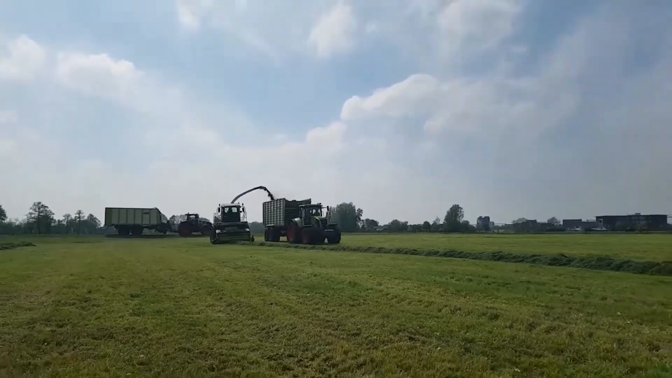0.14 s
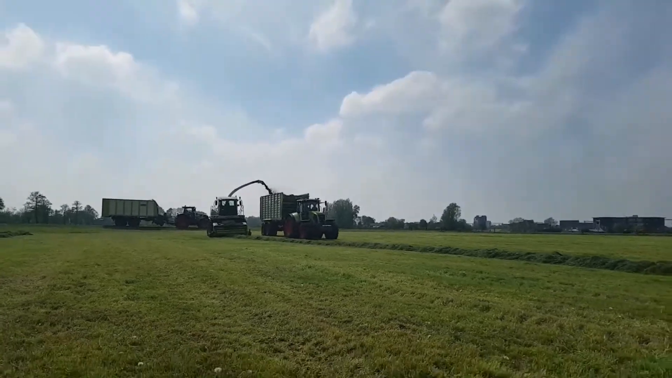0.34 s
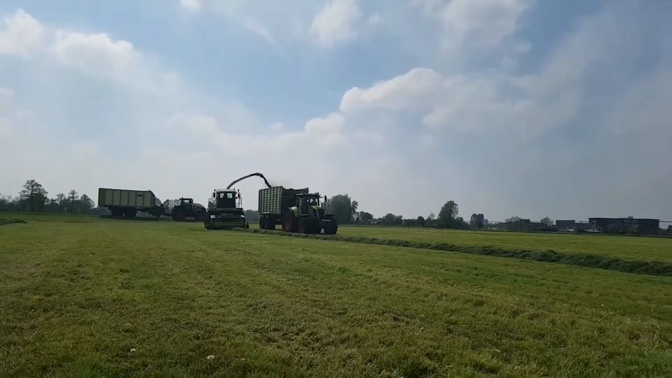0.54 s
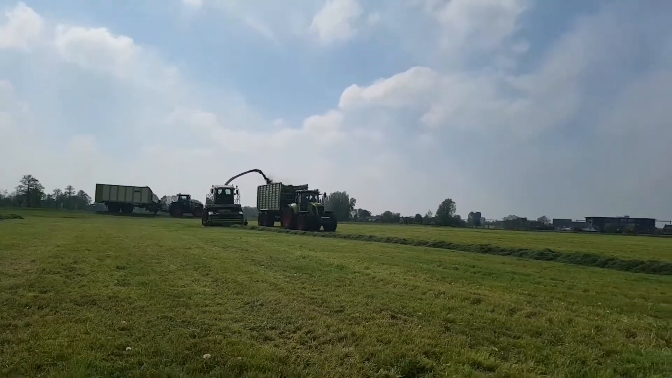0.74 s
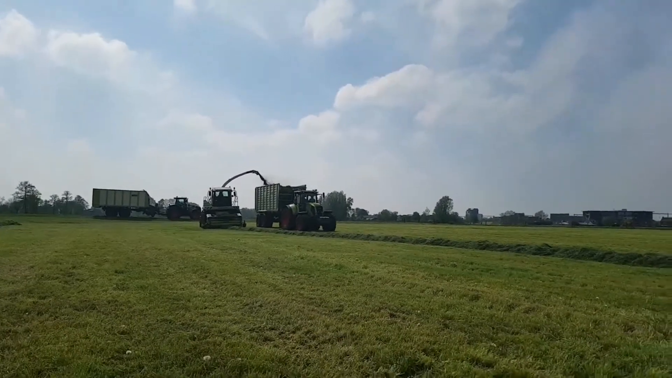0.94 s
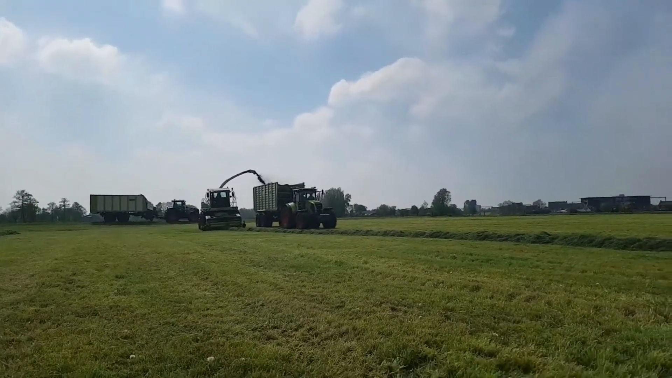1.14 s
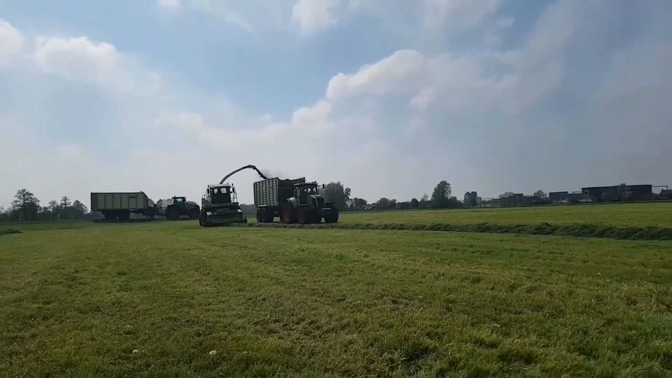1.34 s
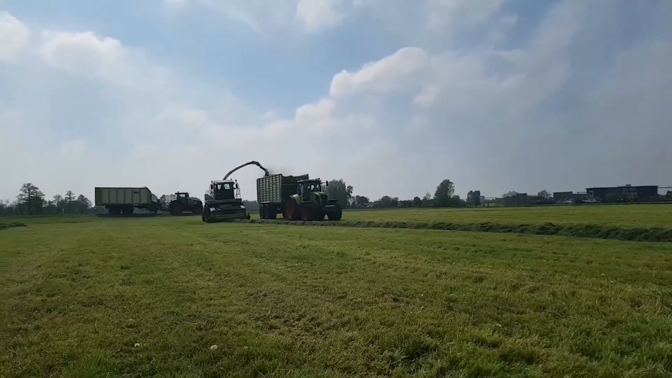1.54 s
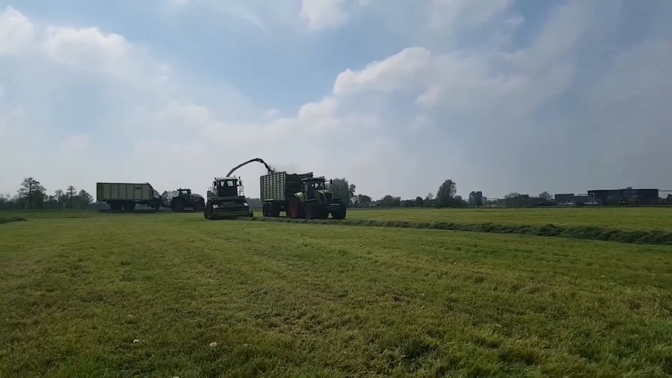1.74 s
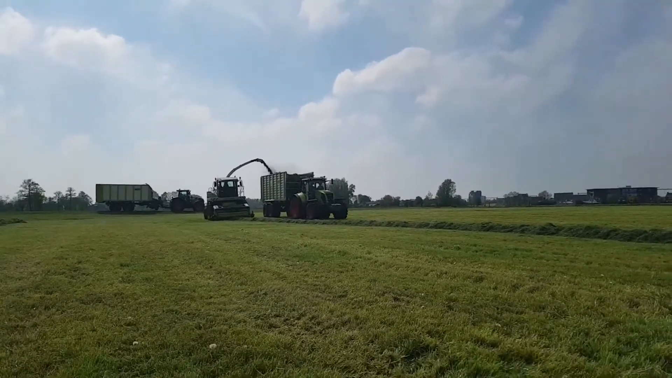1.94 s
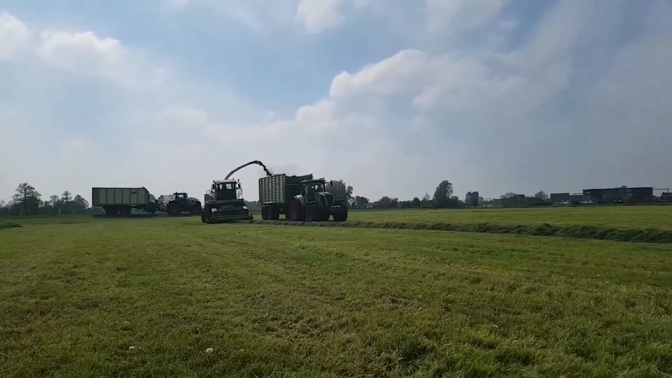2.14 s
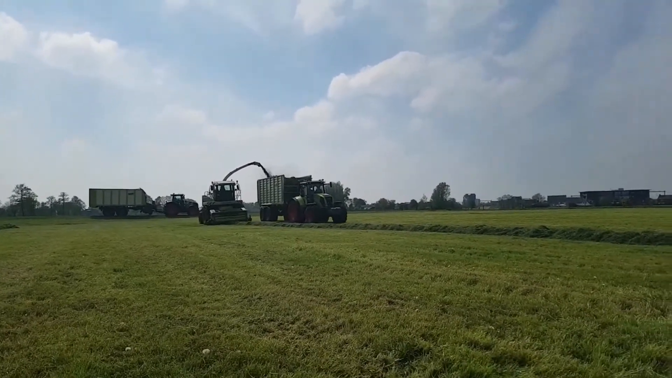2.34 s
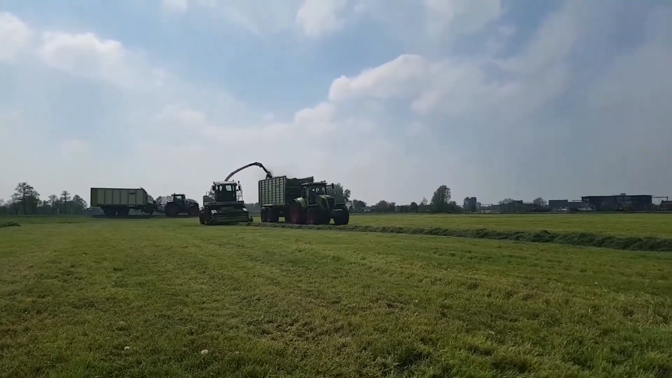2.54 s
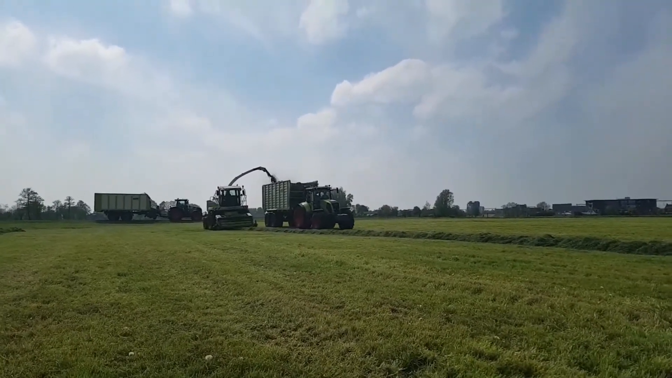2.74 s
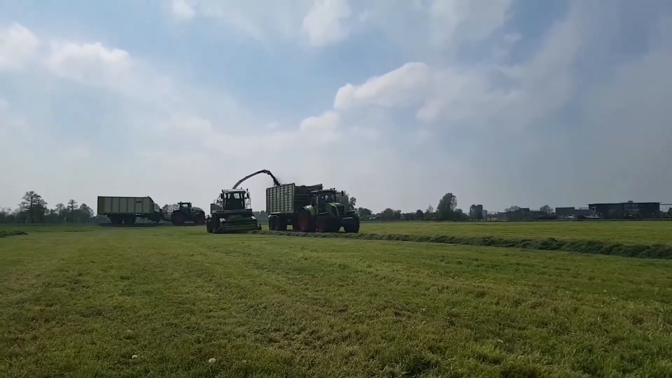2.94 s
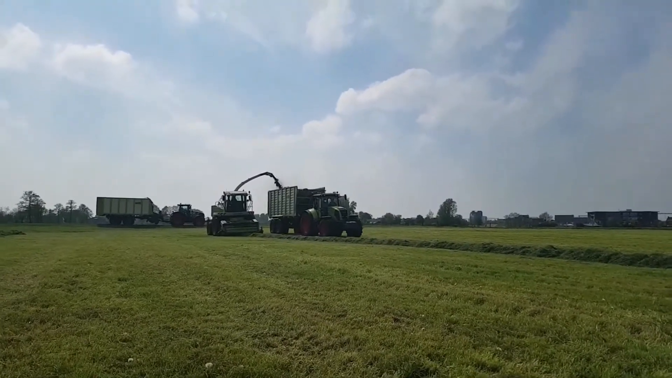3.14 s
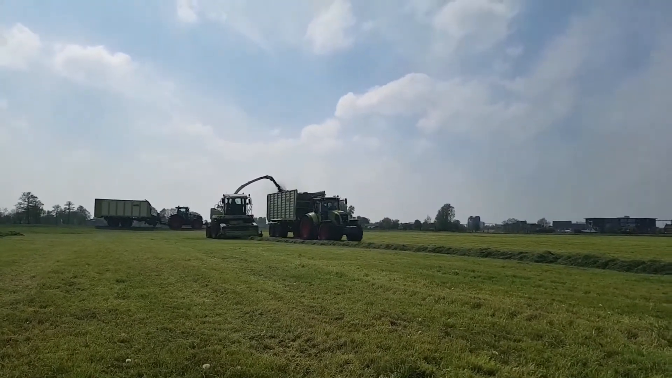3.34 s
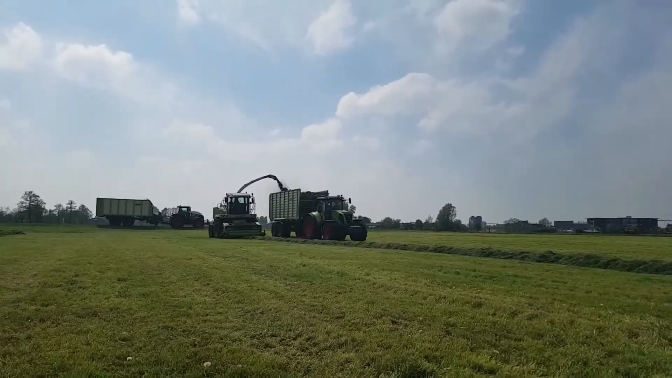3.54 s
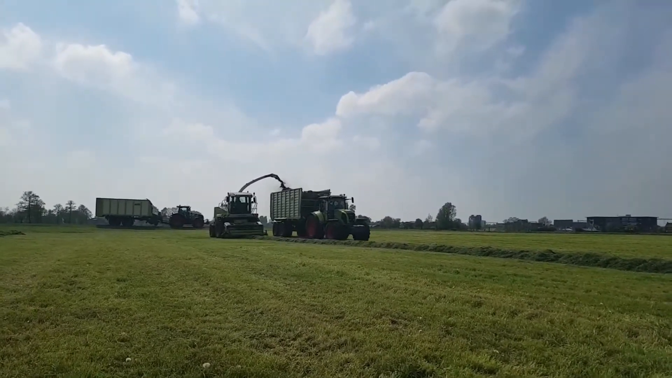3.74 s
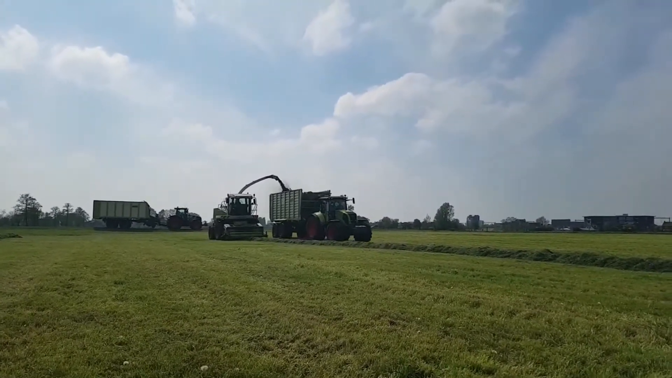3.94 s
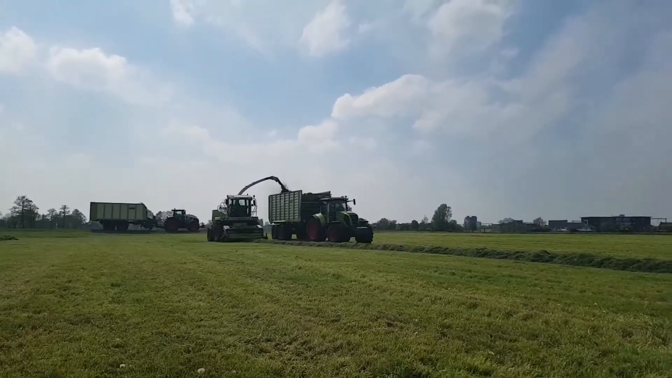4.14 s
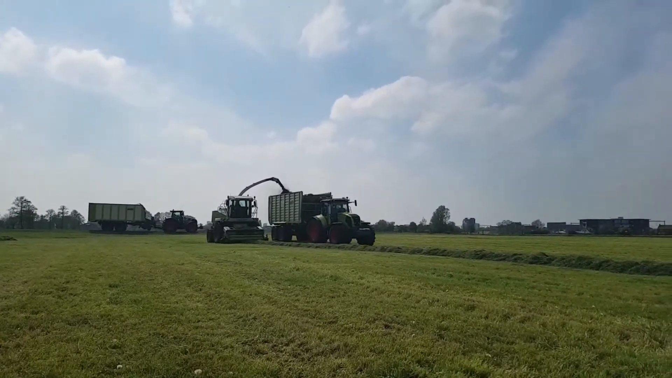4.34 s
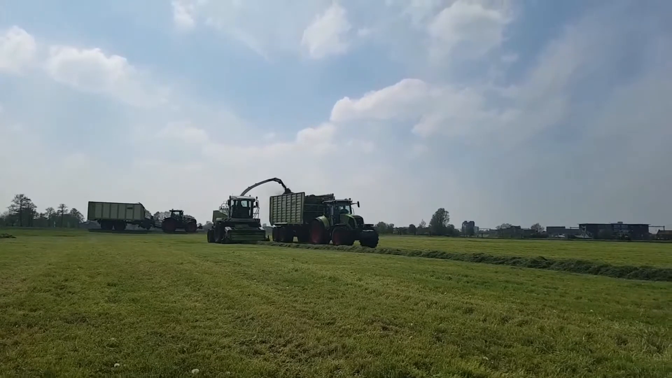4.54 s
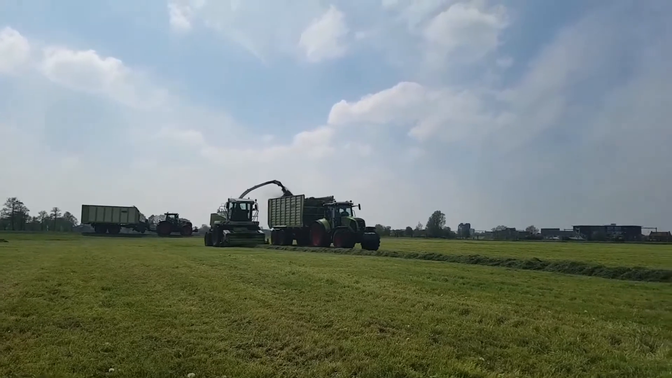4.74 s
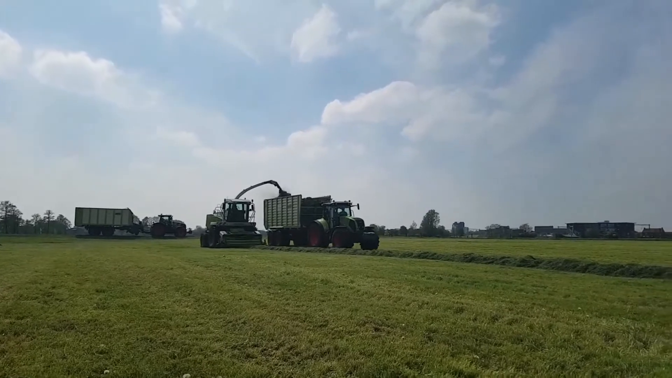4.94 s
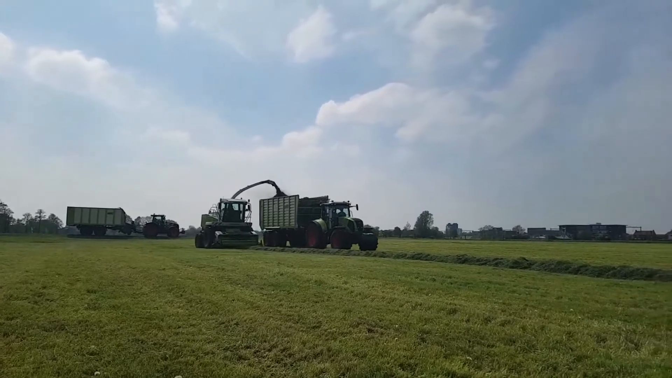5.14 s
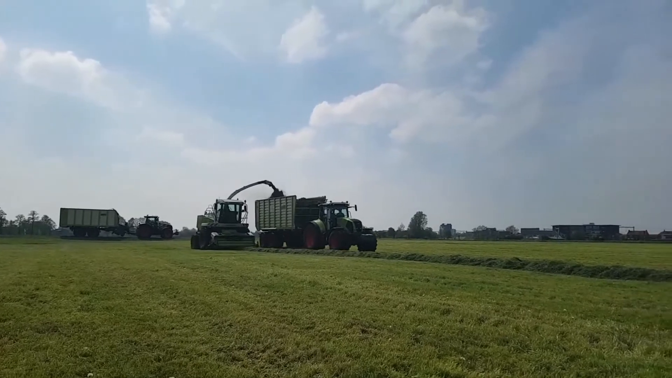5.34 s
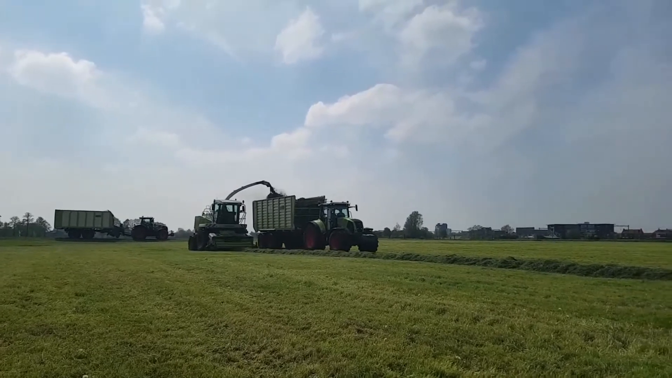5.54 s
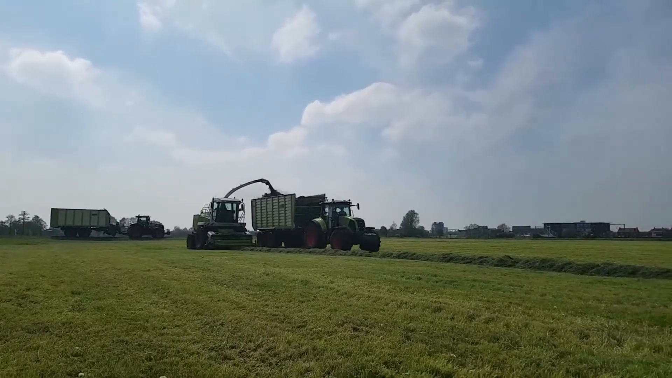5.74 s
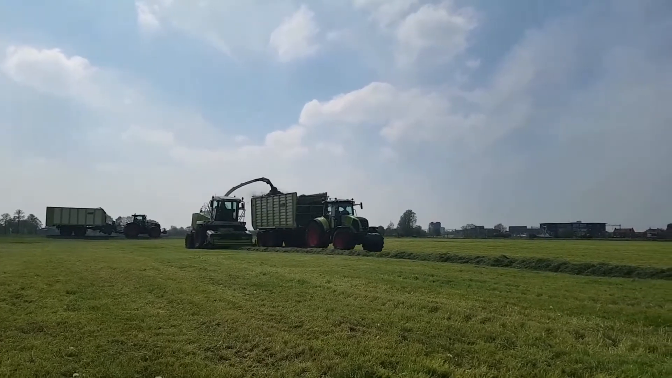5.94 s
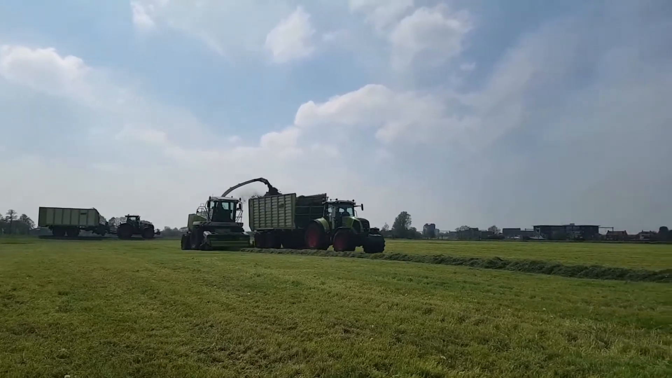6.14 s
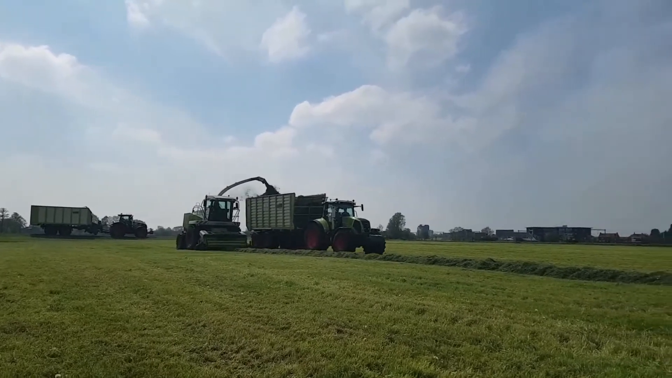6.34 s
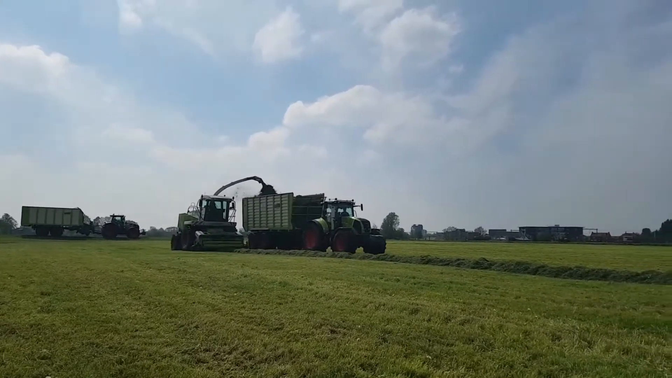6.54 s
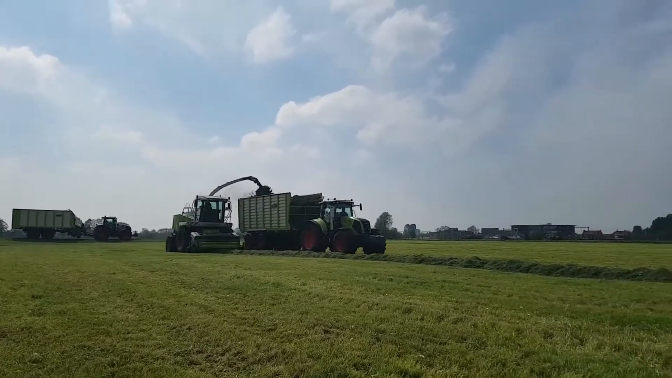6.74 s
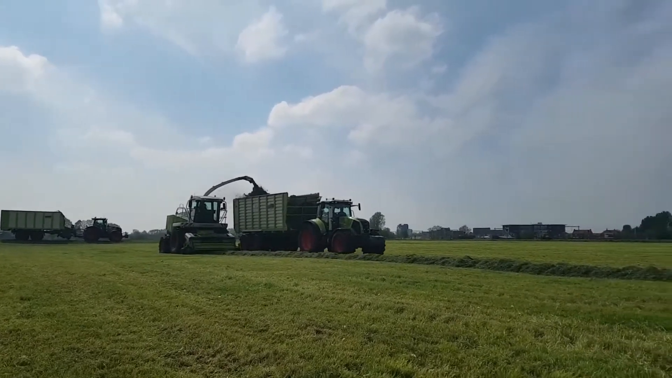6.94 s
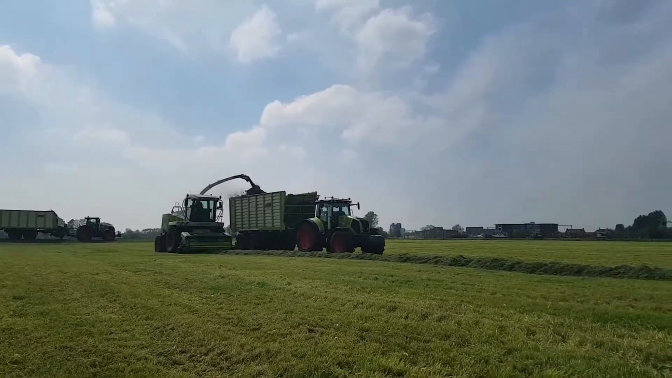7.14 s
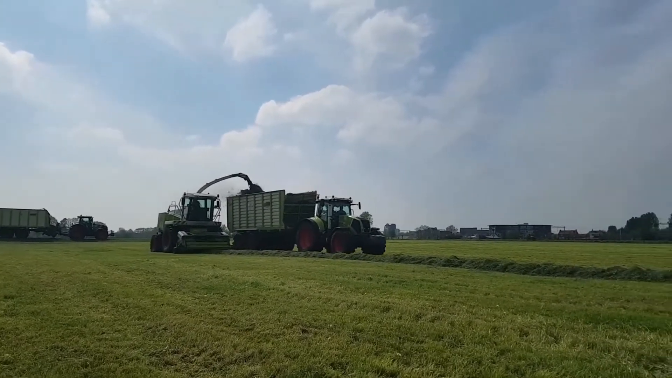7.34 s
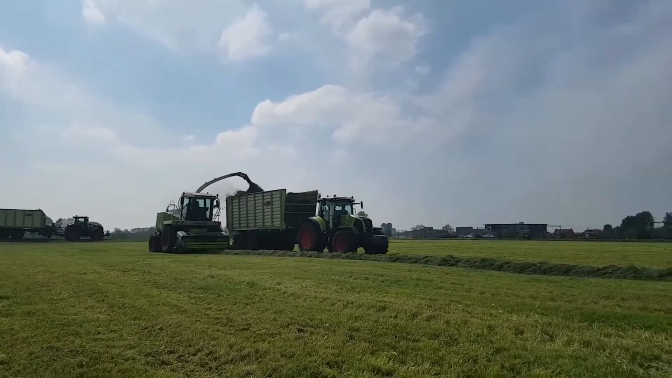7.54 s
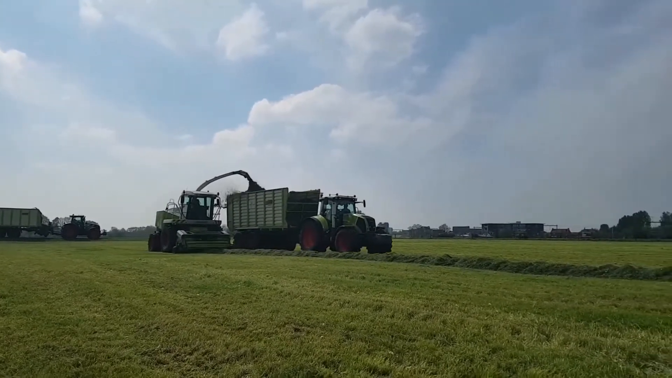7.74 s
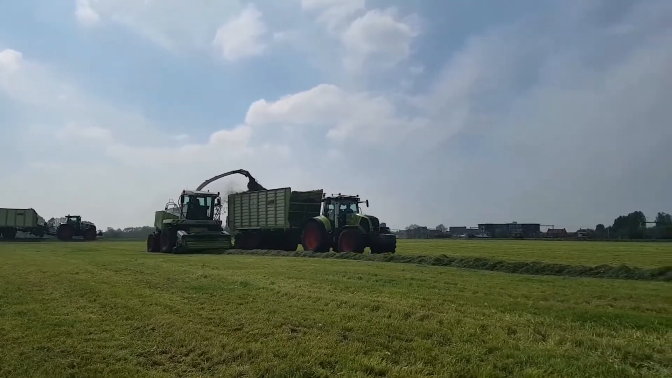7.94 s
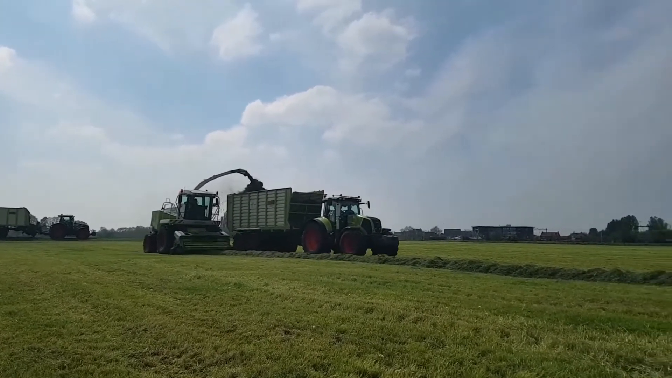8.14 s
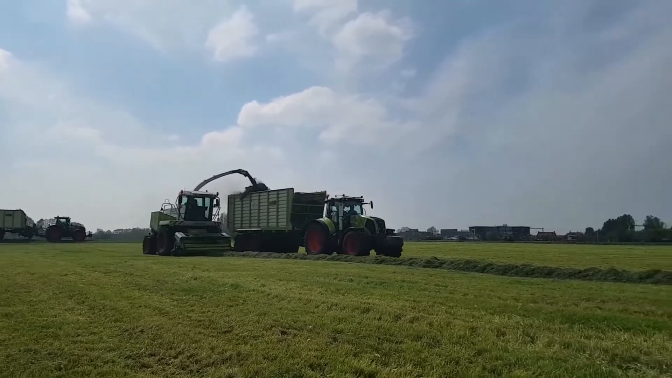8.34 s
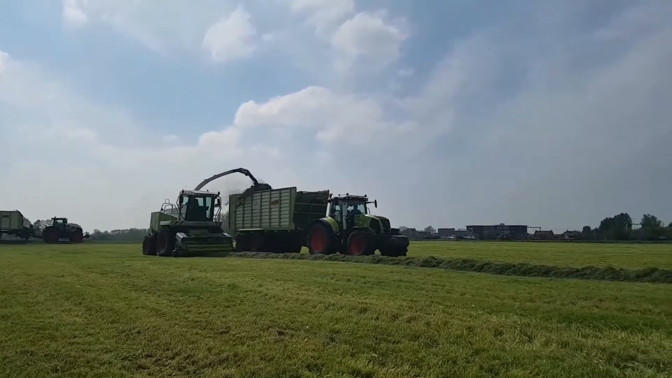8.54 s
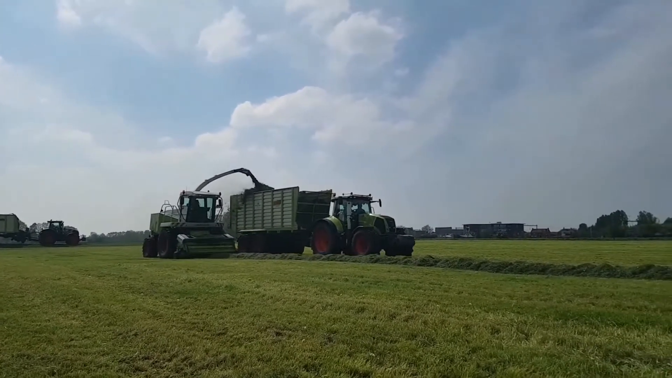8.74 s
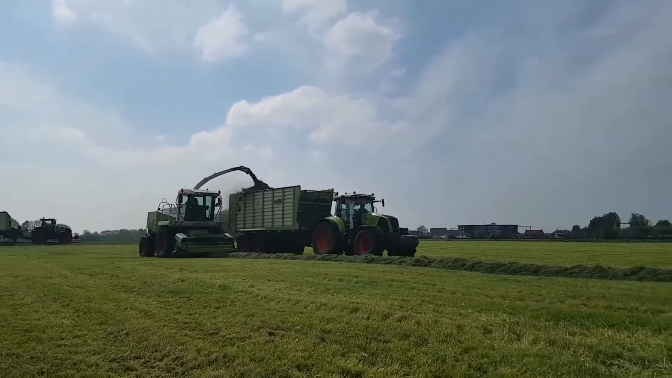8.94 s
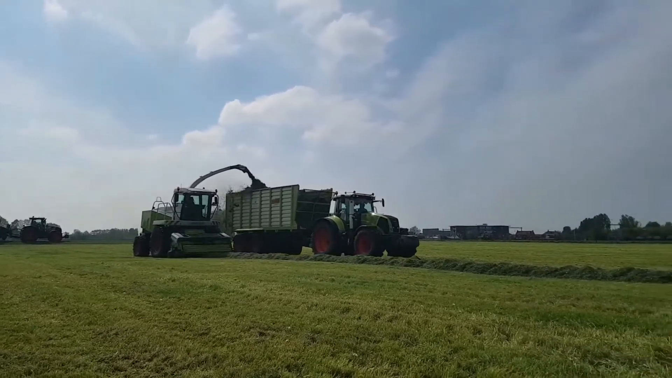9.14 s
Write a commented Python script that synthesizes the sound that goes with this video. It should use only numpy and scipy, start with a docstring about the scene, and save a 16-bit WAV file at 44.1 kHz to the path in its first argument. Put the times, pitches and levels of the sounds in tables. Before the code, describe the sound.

Deep humming drone of a grass chopper with tractor and wagon approaching, broadband roar and faint whine swelling, wind buffeting the microphone at first.

```python
"""Open field: a forage harvester and a tractor with wagon draw nearer, heard by a phone with two ports.
The chopping drum drones at six beats a turn, as wavering sine harmonics with weaker shaft orders.
A pump whines, and the tractor engine and turbos drift in pitch; all are sine partials.
Crop stream and fans roar as banded noise; wind buffets each port alone as filtered noise and short pops."""
import sys
import numpy as np
from scipy import signal
from scipy.fft import rfft, irfft, next_fast_len
from scipy.io import wavfile
from scipy.ndimage import uniform_filter1d

SR = 44100
rng = np.random.default_rng(int(sys.argv[2]) if len(sys.argv) > 2 else 0)


def persist_wave(psi):
    """Save psi, clipped to +-1, as 16-bit WAV."""
    counts = np.round(np.clip(psi, -1, 1) * 32767).astype(np.int16)
    wavfile.write(sys.argv[1], SR, np.atleast_2d(counts).T)


N = 409688

# drum speed under the changing crop load: (t/s, beat rate f/Hz)
DRUM_SPEED = [(0, 123.1), (1.45, 122.8), (2.0, 121.9), (2.6, 122.4), (4.15, 121.8), (4.65, 123),
              (5.0, 121.6), (6.1, 121.2), (7.0, 122.1), (7.8, 121.4), (8.3, 122.4), (9.29, 121.7)]
# the drone fades deeply while far away and steadies as it nears: (t/s, level/dB)
DRONE_LEVEL = [(0.0, -22), (0.13, -14), (0.36, -16.5), (0.44, -23.5), (0.82, -13.5), (0.96, -27),
               (1.01, -17), (1.09, -24.5), (1.81, -15), (2.3, -18.5), (2.74, -12), (3.18, -15.5),
               (3.7, -12), (3.83, -16.5), (4.04, -10), (4.32, -16.5), (4.47, -14), (4.58, -18),
               (4.73, -11.5), (5.98, -9.5), (9.21, -11.5), (9.29, -10)]
# even harmonics of the beat: (t/s, second level/dB, fourth level/dB)
EVEN_LEVEL = [(0.0, -22.5, -43), (0.13, -46, -43), (0.36, -29, -36), (0.8, -40, -34), (0.9, -28, -37),
              (1.09, -40, -31), (1.78, -37.5, -51), (1.99, -35, -36), (2.07, -30, -39.5),
              (2.48, -37.5, -39.5), (3.02, -33, -34.5), (4.14, -29.5, -37), (4.79, -39.5, -31.5),
              (6.42, -27, -34), (6.7, -26.5, -28.5), (8.38, -25, -32), (8.51, -26, -27.5),
              (9.16, -27, -35.5), (9.29, -32, -47)]
# the third harmonic swells and sinks on its own: (t/s, level/dB)
THIRD_LEVEL = [(0, -40), (.17, -26.5), (.55, -37), (.85, -26), (1.3, -38.5), (1.8, -29.5), (2.55, -36),
               (2.8, -26.5), (3.5, -38.5), (3.7, -30.5), (3.83, -30.5), (3.95, -18.5), (4.1, -30.5),
               (4.25, -26), (4.45, -40), (4.65, -27.5), (4.8, -37), (4.98, -23.5), (5.4, -27), (6.1, -20),
               (6.7, -23.5), (6.97, -28.5), (7.3, -21.5), (7.46, -25), (7.8, -16.5), (8.05, -26),
               (8.27, -19.5), (8.45, -34), (8.62, -23), (8.8, -30), (9.08, -16.5), (9.29, -24)]
# upper harmonics surge unevenly: (t/s, fifth level/dB, sixth level/dB, eighth level/dB)
UPPER_LEVEL = [(0.0, -56, -41, -44), (0.15, -42, -47, -66), (0.26, -42.5, -43, -55),
               (0.57, -45.5, -58, -56), (0.88, -43, -44, -48), (1.27, -48, -54.5, -55.5),
               (2.25, -51.5, -50, -44), (2.59, -47, -61, -52.5), (3.57, -48, -48.5, -52),
               (4.66, -48, -42.5, -43), (4.86, -46, -50, -53), (5.09, -48, -40, -47), (5.4, -49, -42, -51),
               (5.6, -47.5, -51, -48), (5.87, -47, -51, -46), (6.16, -41, -43.5, -49),
               (7.58, -47.5, -55, -47), (7.71, -40.5, -43, -49), (8.8, -39, -60, -42),
               (9.11, -35.5, -42, -50), (9.29, -37, -48, -44)]
# weaker orders of the drum shaft: (multiple of the turn rate, level at mean distance/dB)
SHAFT_ORDERS = [(5, -32), (8, -34.5), (10, -39), (16, -43), (42, -52), (54, -55), (60, -56)]
# pump harmonics and one whine just off the series: (multiple of the pump rate, level at mean distance/dB)
PUMP_HARMONICS = [(1, -49), (2, -56), (3, -57), (5.037, -64), (6, -56)]
# swells of the whine, added as power: (t/s, length/s, multiple of the pump rate, level/dB)
PUMP_SWELLS = [(3.6, .55, 6, -48), (4.7, .15, 6, -47), (5.37, .17, 5.037, -40), (5.56, .3, 5.037, -43),
               (5.0, .25, 6, -45), (5.5, .75, 6, -43), (6.3, .42, 6, -43), (6.95, .5, 6, -45),
               (7.45, .45, 6, -42), (8.3, .3, 6, -42), (8.8, .5, 3, -47), (7.0, .4, 2, -48),
               (8.3, .9, 2, -48)]
# tractor firing note: (t/s, f/Hz, level/dB)
TRACTOR_FIRING = [(0, 55.2, -28.5), (1.65, 57.5, -38), (2.6, 60, -35.5), (3.7, 63, -35.5),
                  (4.3, 70.85, -29), (6.1, 71.8, -33.5), (7.3, 63.3, -42.5), (9.29, 62.3, -43)]
# turbo whistles, upper and lower: (t/s, f/Hz, level/dB)
TURBO_HIGH = [(0, 9240, -82), (.5, 8640, -79), (1.1, 7800, -84.5), (1.8, 7850, -74), (3, 7983, -70.5),
              (4.4, 8362, -65.5), (5, 8510, -74), (5.6, 8800, -74), (6, 9040, -95)]
TURBO_LOW = [(1.1, 4900, -90), (1.42, 5220, -67), (1.57, 5380, -52), (1.72, 5500, -65), (1.93, 5700, -76),
             (2.02, 5770, -62), (2.3, 5970, -65), (2.5, 6080, -70), (2.8, 6190, -72), (2.95, 6250, -63),
             (3.15, 6350, -63), (3.7, 6500, -80), (3.9, 6550, -95)]
# approach of the machines, used relative to its mean: (t/s, nearness level/dB, extra treble level/dB)
APPROACH = [(0.0, -43, -7), (1.03, -48.5, -7.5), (1.47, -44.5, -6.5), (2.53, -43.5, -8), (2.77, -42, -9),
            (3.4, -41.5, -5.5), (4.99, -38, -4), (5.3, -37.5, -4.5), (6.54, -36.5, -8.5), (6.91, -35, -3.5),
            (7.14, -36.5, -1.5), (7.45, -35.5, -4.5), (7.7, -36.5, -2), (8.23, -34.5, -5.5),
            (9.29, -36, -2)]
# relative spectrum of the roar: (f/Hz, level per Hz/dB)
ROAR_COLOUR = [(25, -21), (50, -12.5), (90, -4), (150, -0.5), (300, -11.5), (450, -11.5), (600, -19.5),
               (1100, -23), (1750, -20), (2600, -23.5), (4000, -29), (4900, -32), (5600, -37),
               (7600, -36.5), (8300, -46), (8700, -60), (12500, -64.5), (14000, -75)]
# ducts that colour the roar: (f/Hz, width/Hz, gain/dB)
DUCTS = [(795, 80, -3), (920, 60, -2), (1270, 90, -2), (1580, 260, -2), (1750, 110, -4), (1920, 160, 1.5),
         (2060, 170, -4.5), (2380, 250, -1), (2800, 200, 1.5)]
# likeness of the roar at the two ports: (f/Hz, shared part of the power 0-1)
SHARED = [(60, .99), (250, .98), (1000, .92), (1600, .8), (1950, .4), (2300, .85), (3000, .58), (4500, .38),
          (8000, .28)]
# light air between gusts, before the eddy bands: (t/s, level/dB)
BREEZE = [(0, -31.5), (2.6, -34), (2.9, -54), (3.6, -49.5), (4.2, -37), (7.0, -36.5), (9.29, -28)]
# strongest gusts, before the eddy bands: (t/s, length/s, level/dB, port: minus left, plus right)
GUSTS = [(0.027, 0.075, -15.5, -1.0), (0.41, 0.15, -17, -1.0), (0.44, 0.065, -17.5, 1.0),
         (0.626, 0.085, -20.5, -1.0), (0.719, 0.051, -16, 1.0), (0.855, 0.04, -15, 1.0),
         (0.892, 0.036, -20, -1.0), (0.94, 0.24, -16.5, 1.0), (1.08, 0.11, -17, -1.0),
         (1.195, 0.11, -18.5, 1.0), (2.329, 0.036, -18.5, -1.0), (4.315, 0.032, -18.5, 1.0),
         (5.729, 0.2, -20, 1.0), (6.968, 0.027, -14, 1.0), (8.069, 0.13, -20.5, -1.0),
         (8.772, 0.072, -20, -1.0)]
# sharp eddies, before filtering: (t/s, peak level/dB, rise/ms, port: minus left, plus right)
POPS = [(0.252, -9, .6, -1), (0.328, -10, 1.5, -1), (0.421, -6, .48, 1), (0.450, -8, .45, -1),
        (0.455, -5, .8, 1), (0.849, -8, .35, 1), (0.864, -2.5, .4, 1), (0.882, -6, .8, 1),
        (0.902, -7, .55, -1), (0.9105, -0.5, .45, 1), (0.935, -7, 1.3, 1), (0.953, -6, .4, 1),
        (0.965, -2, .36, 1), (0.980, -5.5, 1.1, 1), (0.9975, -5, .33, 1), (1.028, -7, 1.5, -1),
        (1.042, -8, .45, 1), (1.061, -6, .45, 1), (1.077, -5, 1.7, -1), (1.0955, -4, .33, -1),
        (1.100, -1.5, .36, -1), (1.127, -8, 1.5, -1), (1.211, -8, .55, 1)]
# level balance of the phone ports: (f/Hz, left minus right level/dB)
BALANCE_DB = [(60, 0), (120, -.3), (1200, -1), (1550, 1), (2300, -4.5), (3000, -7), (4000, -12),
              (5000, -9.5), (7000, -7), (8200, -8)]
# phase between the phone ports: (f/Hz, lead of the left/rad)
LEAD = [(0, 0), (120, .045), (240, .2), (860, .5), (1200, 1), (1500, .8), (1750, 1.8), (2100, -1.2),
        (2500, .5), (3200, .9), (4400, 3), (5500, 5.6), (6000, 6.4), (7200, 5.6), (8200, 6.9)]
# dip in the right port: (f/Hz, width/Hz, gain/dB)
RIGHT_NOTCH = (1940, 400, -7)

BEATS_PER_TURN, BEAT_WANDER_HZ = 6, 0.2974
PUMP_PER_BEAT = 3.642  # the pump is geared to the drum
ROAR_DB = -25.5  # RMS level ahead of the ports
RIPPLE_HZ, RIPPLE_DB = 60, 1.0
RASP_DB, RASP_RATE = .8, 45  # shared unevenness of the chopped stream in the treble; rate per second
CRACKLE_HZ, CRACKLE_DB, CRACKLE_MS = (450, 1100), -33, 7  # level for a 1 ms rise
POP_HZ = (75, 1300)
SUCK_STRETCH = 1.7  # the suck lasts this much longer than the push
TOP_HZ = 14300
TIME = np.arange(N) / SR
EDGE = 2048  # samples of margin around the sound while it is filtered
SIZE = next_fast_len(N + 2 * EDGE, real=True)
BINS = np.arange(SIZE // 2 + 1) * SR / SIZE


def drum(beats, near_db):
    """Six beats a turn dominate; uneven knives leave weaker shaft orders."""
    second_db, fourth_db = curves(EVEN_LEVEL)
    drone_db = curves(DRONE_LEVEL)[0] + 1.2 * walk(5)
    out = tone(beats, drone_db, flutter_db=0.9, rate=20, wobble=0.14)
    out += tone(2 * beats, second_db, flutter_db=1.4, rate=14, wobble=.26)
    out += tone(3 * beats, curves(THIRD_LEVEL)[0], flutter_db=1.8, rate=16, wobble=0.5)
    out += tone(4 * beats, fourth_db, flutter_db=1.0, rate=14, wobble=0.32)
    for multiple, db in zip((5, 6, 8), curves(UPPER_LEVEL)):
        out += tone(multiple * beats, db, flutter_db=2.2, rate=10, wobble=.45)
    turns = beats / BEATS_PER_TURN
    for order, db in SHAFT_ORDERS:
        out += tone(order * turns, db + .7 * near_db, flutter_db=3.5, rate=7, wobble=.6 + order / 60)
    return out


def drum_beats(wander_hz):
    """Beats counted since the start; the speed wanders at random around its curve."""
    return np.cumsum(curves(DRUM_SPEED)[0] + wander_hz * walk(5)) / SR


def roar(near_db, treble_db):
    """Half-octave bands swell together and flicker alone, less alike at the ports toward the treble."""
    shared = np.clip(over_bins(SHARED), 0, 1)
    common, left, right = rfft(rng.standard_normal((3, SIZE)))
    noise = np.sqrt(shared) * common + np.sqrt(1 - shared) * np.array([left, right])
    noise = noise * undb(over_bins(ROAR_COLOUR))
    # panels and ducts add many small resonances, a hundred-odd Hz wide
    wide = int(RIPPLE_HZ / BINS[1])
    ripple = uniform_filter1d(uniform_filter1d(rng.standard_normal(len(BINS)), wide), wide)
    noise = noise * undb(RIPPLE_DB * ripple / ripple.std())
    duct_db = sum(db * np.exp(-(2 * (BINS - hz) / width) ** 2) for hz, width, db in DUCTS)
    noise = noise * undb(duct_db)

    rasp = RASP_DB * walk(RASP_RATE)
    swell = walk(7.6)
    octaves = np.log2(BINS + 1)
    out = 0
    for hz in 25 * np.sqrt(2) ** np.arange(19):
        band = np.cos(np.pi * np.clip(octaves - np.log2(hz), -.5, .5)) ** 2
        far = np.clip(np.log2(hz / 2500), 0, 1)  # air and grass take the treble first
        db = near_db * np.clip(.45 + hz / 2400, 0, 1)
        db = db + far * (treble_db + rasp)
        db = db + .35 * swell + (.9 + .2 * far) * walk(14)
        out = out + undb(db) * irfft(noise * band, SIZE)[:, :N]
    return out * undb(ROAR_DB) / np.sqrt(np.mean(out ** 2))


def pump(beats, near_db):
    """Whining harmonics follow the drum speed; several of them swell and sink."""
    out = 0
    for multiple, db in PUMP_HARMONICS:
        power = undb(2 * (db + near_db))
        for s, length, swelling, top_db in PUMP_SWELLS:
            if swelling == multiple:
                power += undb(2 * top_db) * bump(s, length)
        turns = multiple * PUMP_PER_BEAT * beats
        out += np.sqrt(power) * tone(turns, 0, flutter_db=2, rate=22, wobble=.07 * multiple)
    return out


def tractor_engine():
    """The firing note drifts with engine speed."""
    return drifting_tone(TRACTOR_FIRING, flutter_db=1.5, rate=14, wobble=.3)


def turbos():
    """Two high whistles glide in pitch, each a single wavering partial."""
    high = drifting_tone(TURBO_HIGH, flutter_db=4, rate=30, wobble=2.)
    return high + drifting_tone(TURBO_LOW, flutter_db=3, rate=40, wobble=1.)


def wind():
    """Eddies thump each port alone; stronger ones are sharper and reach higher."""
    power = np.array([undb(2 * (curves(BREEZE)[0] + 4.2 * walk(14))) for _ in range(2)])
    for s, length, db, port in GUSTS:
        power[int(port > 0)] += undb(2 * db) * bump(s, length)
    size = np.sqrt(power)
    lumps = undb(1.6 * np.array([walk(90), walk(90)]))
    # eddy bands: low f/Hz, high f/Hz, gain/dB, exponent of growth with gust size
    bands = ((43.0, 142, -5.5, 0.83), (104, 275, 7.5, 1.49), (282, 700, 10.5, 2.46), (700, 1400, 6.0, 3.54))
    out = 0
    for low_hz, high_hz, db, steep in bands:
        eddy = bandpass(3, (low_hz, high_hz), rng.standard_normal((2, N)) * lumps * size ** steep)
        out = out + undb(db) * eddy / np.sqrt(2 * (high_hz - low_hz) / SR)
    return out + pops()


def pops():
    """A brief suck and a sharper push on the membrane; the quick ones crackle more."""
    out = np.zeros((2, N))
    crackle = bandpass(3, CRACKLE_HZ, rng.standard_normal(N))
    crackle /= crackle.std()
    for s, db, rise_ms, port in POPS:
        near = slice(int((s - .015) * SR), int((s + .015) * SR))
        ms = (TIME[near] - s) * 1000
        t = ms / rise_ms / np.where(ms < 0, SUCK_STRETCH, 1)
        thump = t * np.exp((1 - t ** 2) / 2)  # the push peaks at 1 when t = 1
        fizz = undb(CRACKLE_DB) / rise_ms * np.exp(-(ms / CRACKLE_MS) ** 2) * crackle[near]
        out[int(port > 0), near] += undb(db) * (thump + fizz)
    return bandpass(2, POP_HZ, out)


def ports(sound):
    """The phone body shades the left port's treble and sets a phase lead between the ports."""
    half = undb(over_bins(BALANCE_DB) / 2) * np.exp(.5j * over_bins(LEAD))
    hz, width, db = RIGHT_NOTCH
    notch = undb(db * np.exp(-(2 * (BINS - hz) / width) ** 4))
    padded = np.pad(sound, ((0, 0), (EDGE, EDGE)), "reflect")
    filtered = irfft(rfft(padded, SIZE) * np.array([half, notch / half]), SIZE)
    return filtered[:, EDGE:EDGE + N]


def tone(turns, db, flutter_db, rate, wobble):
    """A partial whose level and phase (wobble, rad) waver in the moving air over the field."""
    phase = 2 * np.pi * (turns + rng.random()) + wobble * walk(rate)
    return np.sqrt(2) * undb(db + flutter_db * walk(rate)) * np.sin(phase)


def drifting_tone(table, flutter_db, rate, wobble):
    """A partial that follows a table of pitch and level, its phase summed from frequency."""
    hz, db = curves(table)
    return tone(np.cumsum(hz) / SR, db, flutter_db, rate, wobble)


def walk(rate):
    """Random levels held 1 / rate s and slewed twice; spread near 1."""
    steps = 16
    held = np.repeat(rng.standard_normal(int(N / SR * rate) + 2), steps)
    slewed = uniform_filter1d(uniform_filter1d(held, steps), steps)
    return np.interp(TIME, np.arange(len(held)) / (steps * rate), 1.222 * slewed)


def bump(s, length):
    """A swell that is 6 dB down in power at half its length from the middle."""
    out = np.zeros(N)
    near = slice(max(int((s - 2 * length) * SR), 0), int((s + 2 * length) * SR))
    out[near] = np.exp(-np.log(4) * (2 * (TIME[near] - s) / length) ** 2)
    return out


def bandpass(order, edges_hz, sound):
    """A Butterworth filter passing what lies between the edges."""
    return signal.sosfilt(signal.butter(order, edges_hz, "band", fs=SR, output="sos"), sound)


def undb(db):
    """Amplitude ratio of a level in dB."""
    return np.exp(np.asarray(db) * np.log(10) / 20)


def curves(table):
    """Columns of a time table at every sample."""
    s, *columns = np.transpose(table)
    return [np.interp(TIME, s, column) for column in columns]


def over_bins(table):
    """A (f/Hz, value) table at every transform bin, on a frequency scale logarithmic above the bass."""
    hz, value = np.transpose(table)
    return np.interp(np.log(BINS + 200), np.log(hz + 200), value)


def scene():
    """The machines reach both ports across the field; wind acts on each port directly."""
    near_db, treble_db = (c - c.mean() for c in curves(APPROACH))
    machines = drum(drum_beats(BEAT_WANDER_HZ), near_db)
    machines = machines + pump(drum_beats(0), near_db)  # follows the speed curve without the wander
    machines = machines + tractor_engine() + turbos()
    machines = machines + roar(near_db, treble_db)
    return ports(machines) + wind()


def record(dry):
    """The phone rounds the loudest thumps and cuts the top."""
    rounded = dry / (1 + np.abs(dry) ** 4) ** (1 / 4)
    return signal.sosfilt(signal.ellip(8, .2, 70, TOP_HZ, fs=SR, output="sos"), rounded)


dry = scene()
out = record(dry)
persist_wave(out)
```